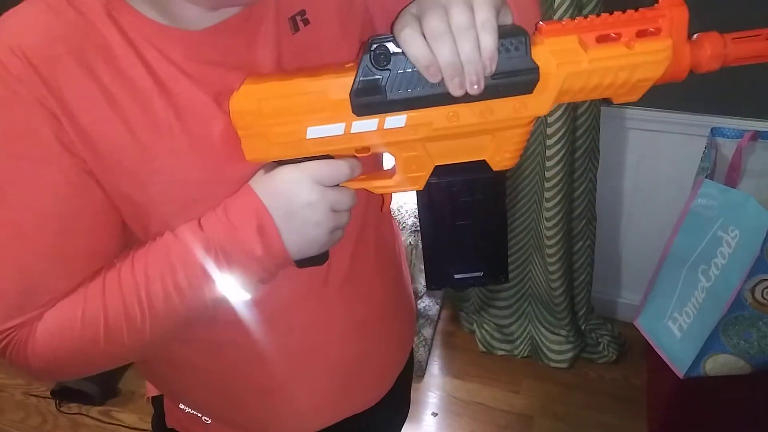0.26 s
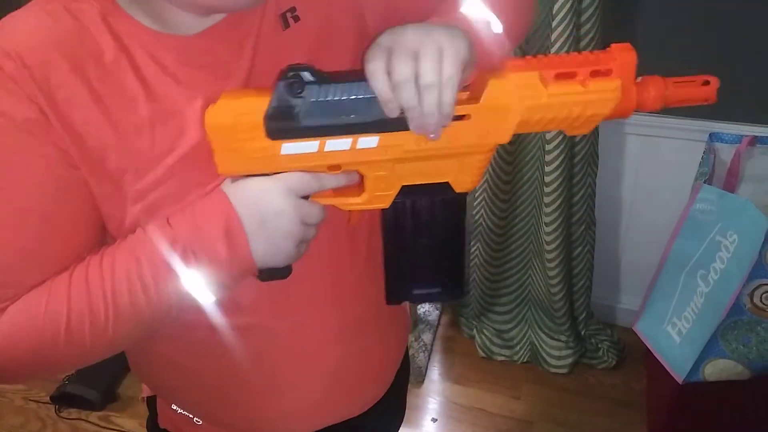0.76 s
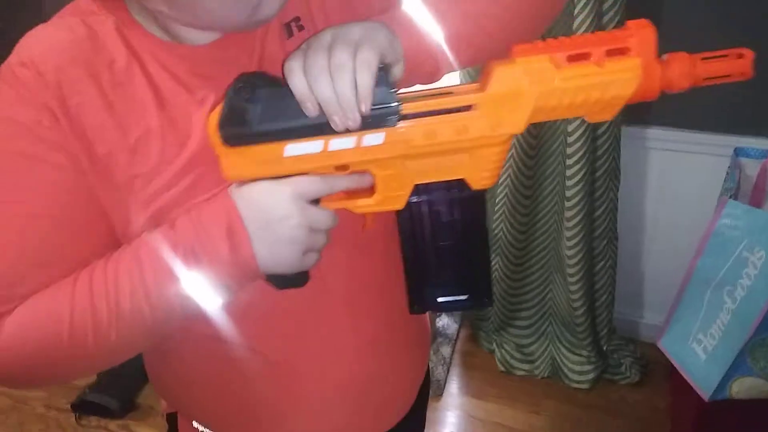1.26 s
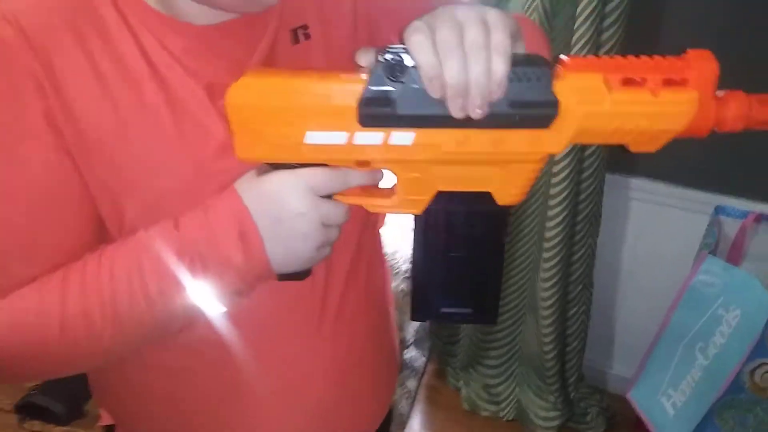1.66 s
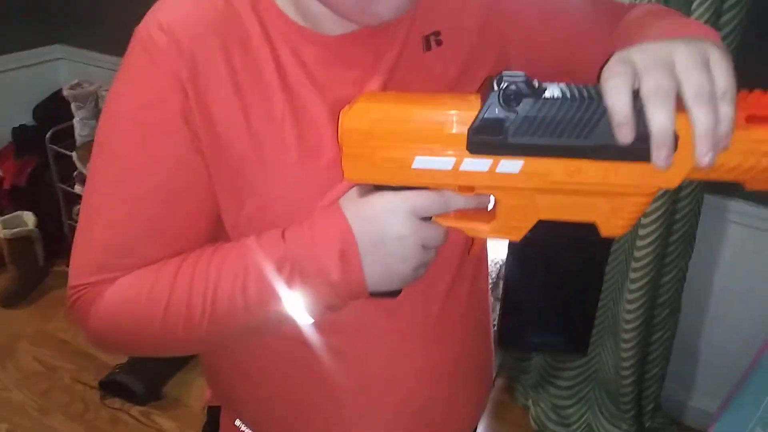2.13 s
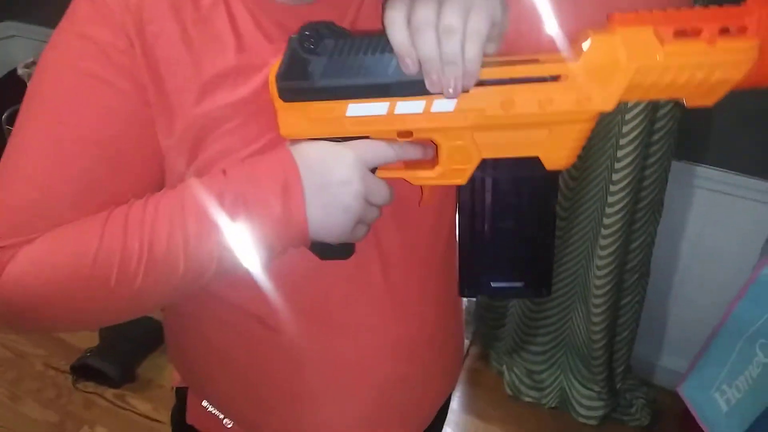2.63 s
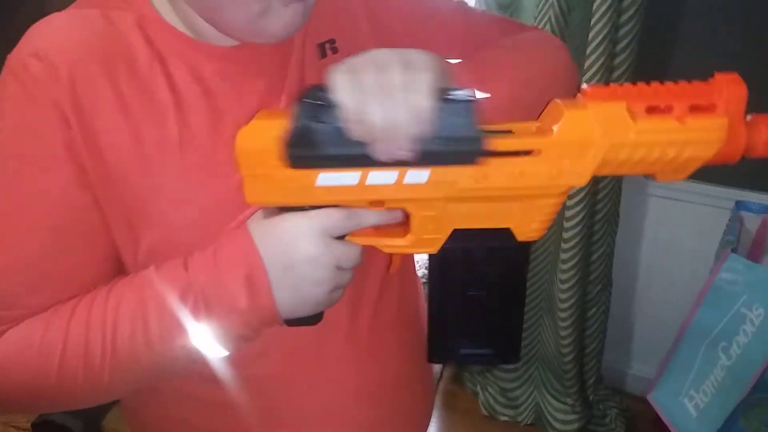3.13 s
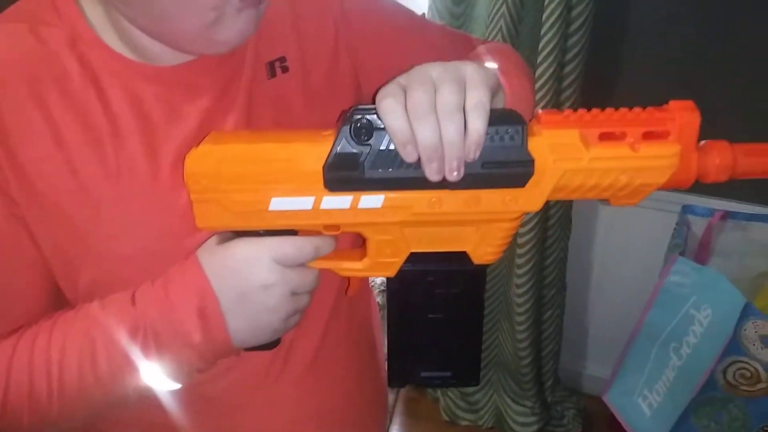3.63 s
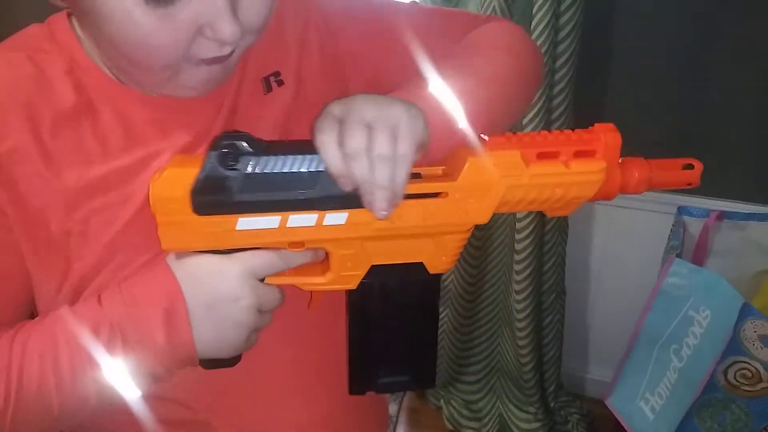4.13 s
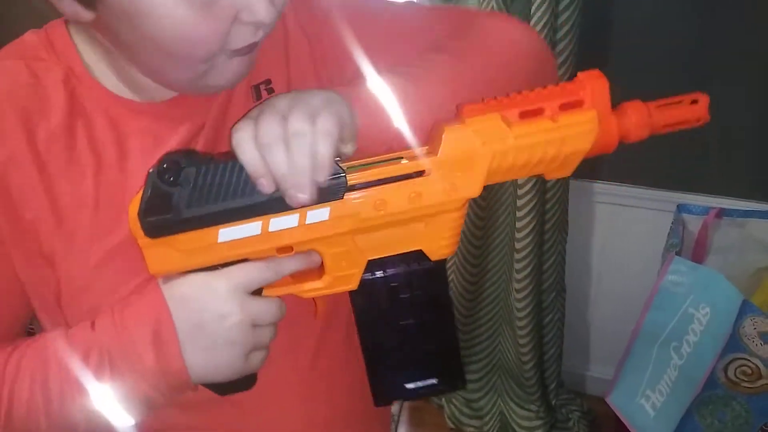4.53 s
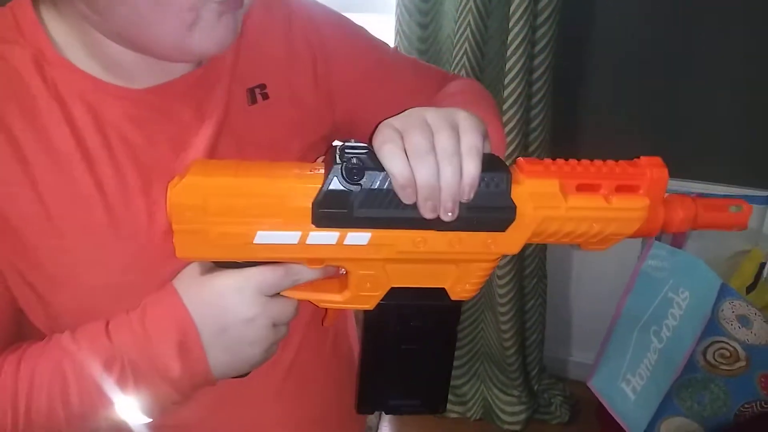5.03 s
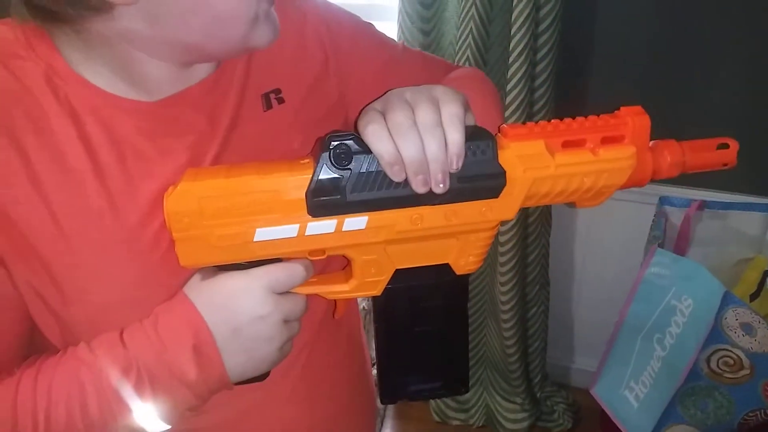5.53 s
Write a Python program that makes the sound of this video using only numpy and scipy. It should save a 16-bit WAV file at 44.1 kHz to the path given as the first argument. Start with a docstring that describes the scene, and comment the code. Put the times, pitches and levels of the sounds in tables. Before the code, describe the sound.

A spring-powered foam dart blaster is fired four times up close indoors, its plastic slide clacking back and shut between loud, punchy snaps.

```python
"""Spring-powered foam dart blaster

Four shots in a small room, close up: filtered noise bursts for the plunger, decaying sines for the air.
About a quarter second after each shot the dart lands across the room, dull and reverberant.
Between shots the plastic slide is pulled back until it catches, then scrapes forward (random grains)
and clacks shut. The loaded spring knocks, buzzes and pings over faint room noise."""
import sys
import numpy as np
from scipy import signal
from scipy.fft import rfft, irfft, next_fast_len
from scipy.io import wavfile
from scipy.ndimage import uniform_filter1d, map_coordinates

SR = 44100
rng = np.random.default_rng(int(sys.argv[2]) if len(sys.argv) > 2 else 0)


def persist_wave(psi):
    """Save psi, clipped to +-1, as 16-bit WAV."""
    counts = np.round(np.clip(psi, -1, 1) * 32767).astype(np.int16)
    wavfile.write(sys.argv[1], SR, np.atleast_2d(counts).T)


N = 255339
T = np.arange(SR * 3 // 4) / SR  # time axis of one event, s
TOP_HZ = 16300  # recorder band limit

# All levels are relative.
# plunger slams: t/s, level/dB, ring f/Hz, ring/dB, thud/dB, snap/dB
SHOTS = [(0.283, -1.5, 783, 1, 2, -8), (1.913, -1.5, 654, 9, 9, -1.5), (3.568, -1.5, 746, 3, 6, -4.5),
         (5.556, -2, 630, 2.5, 6.5, -2.5)]
# contacts in one shot (sear release, slam, rebound, rattle): t after slam/s, level/dB
SHOT_CONTACTS = [(-.0055, -16), (0, 5), (.0075, -3.5), (.013, -13.5)]
# darts landing: t/s, level/dB, ring f/Hz, ring/dB, thud/dB, snap/dB, hollow/dB
LANDINGS = [(0.549, -24, 310, 2, 6, 2, -61), (2.139, -17.5, 550, 12, 15.5, -1.5, -22.5),
            (3.806, -21, 1403, 13, 10.5, 11, -61.5), (5.764, -28.5, 1300, 9, -7, 20, -60)]
# slide breaks free of its front lock: t/s, level/dB, ring f/Hz, ring/dB, bass weight/dB
UNLOCKS = [(0.836, -10, 605, 2, 0.5), (2.419, -10.5, 634, 2.5, -1.5), (4.062, -10, 735, 4.5, 0.5)]
# slide at the back, sear catches plunger: t/s, level/dB, ring f/Hz, ring/dB, bass weight/dB
CATCHES = [(1.066, -22, 1570, 4, -4.5), (2.692, -18, 593, 2, 11.5), (4.339, -22, 1460, 3.5, -13)]
# slide shuts: t/s, level/dB, ring f/Hz, ring/dB, bass weight/dB, push length/s, first shove/dB
CLOSES = [(-0.006, -14.5, 497, 8, 3.5, 0.039, -33.5), (1.645, -10.5, 844, 4, 1.5, 0.056, -30.5),
          (3.287, -11.5, 807, 5, 2.5, .066, -32.5), (4.968, -18.5, 790, 0.5, -1.5, .1, -37)]
# unlocking contacts (slack taken up, lock gives): t after stop/s, level/dB, rise/s, thud/dB, snap/dB
UNLOCK_CONTACTS = [(-.016, -5, 0.0034, -5, -8.5), (0, -1.5, .0004, 3.5, 0.5)]
# catch contacts (ramp, pawl tick, catch, end stop): t after stop/s, level/dB, rise/s, thud/dB, snap/dB
CATCH_CONTACTS = [(-.035, -15.5, 0.0018, -35, -18), (-.019, -15.5, 0.0014, -30, -3), (0, 1, .0018, -17, 0),
                  (.013, -4.5, 0.0026, 5.5, 1)]
# closing contacts (bolt meets dart, slam, lock drops in, rebound):
# t after stop/s, level/dB, rise/s, thud/dB, snap/dB
CLOSE_CONTACTS = [(-.016, -5.5, .0014, -0.5, -8), (0, 0.5, .0004, 6, 2), (.005, -8.5, .0007, 10, -5.5),
                  (.024, -13, .002, -1.5, -13.5)]
# hand sets the slide moving: rise/s, ring f/Hz, ring/dB, thud/dB, snap/dB
SHOVE = (.009, 1251.5, 11.5, 1, -23.5)
# rail rubbing at each stop of the pull: start before stop/s, end after stop/s, final level/dB
UNLOCK_RUB = (.03, -0.0092, -40)
CATCH_RUB = (.045, 0.011, -42.5)
# hollow knocks of the loaded spring in its tube: t/s, level/dB
KNOCKS = [(1.243, -32), (2.794, -30.5), (2.839, -31), (4.519, -34), (4.732, -48)]
# spring coils slip and ping: t/s, level/dB
PINGS = [(1.323, -59), (2.975, -64.5), (3.153, -60.5), (4.579, -53), (5.506, -59)]
# spectra of plunger slam, dart landing, slide pulled back, slide pushed shut: f/Hz, density/dB per Hz
SLAM_SPECTRUM = [(30, -27), (60, -23), (100, -10), (160, -4), (290, 0.5), (450, -3), (720, -4.5),
                 (1000, -8.5), (1550, -4), (2400, -12), (3100, -20.5), (3900, -29.5), (7000, -33),
                 (11000, -40), (14500, -31.5), (17000, -39.5)]
LAND_SPECTRUM = [(40, -41), (100, -8), (170, -12.5), (300, 8.5), (600, 9.5), (1400, 4.5), (2000, -1.5),
                 (2900, -15), (3800, -36), (7000, -52), (16000, -52.5)]
BACK_SPECTRUM = [(40, -28), (100, -15.5), (200, -9.5), (350, 3), (600, -5), (1100, -6.5), (2250, -12),
                 (3500, -28), (5000, -28.5), (8000, -39.5), (11500, -44.5), (14300, -35.5), (17000, -47.5)]
SHUT_SPECTRUM = [(40, -31), (120, -22.5), (280, -8.5), (500, -2.5), (820, 0), (1100, -7), (2000, -3.5),
                 (3200, -22), (3800, -30), (5000, -28.5), (8000, -35.5), (11500, -41), (14300, -28.5),
                 (17000, -38.5)]
# spectra of the spring's tube, the spring's wire, the still room: f/Hz, density/dB per Hz
TUBE_SPECTRUM = [(100, -35), (280, -36.5), (400, -2), (500, 7), (700, 6), (880, -23.5), (1400, -13.5),
                 (2500, -30.5), (4000, -55.5), (16000, -55)]
WIRE_SPECTRUM = [(300, -47), (1300, -27), (1600, -5), (1780, -14), (2000, 0), (2180, -4), (2450, -17),
                 (4000, -47), (16000, -58)]
HUSH_SPECTRUM = [(15, -41), (25, 0), (89, 9), (2050, -14.5), (4030, -13), (5880, -15), (7510, -15.5),
                 (13600, -15), (14800, -13.5), (16000, -9)]
# housing resonances: f/Hz, width/Hz, level/dB
SHELL = [(338, 40, -2.5), (497.3, 12, 10), (648, 39, 5), (803, 110, 6.5), (1450, 210, 0.5), (2114, 190, 3)]
# thin side panels: f/Hz, width/Hz, level/dB
PANELS = [(750, 35, 2.5), (1107, 20, 3.5), (1193, 25, 2.5), (1452, 30, 3.5), (1530, 19, 2.5), (1590, 28, 2),
          (2165, 50, 2.5), (2314, 45, 3.5)]
# modes of a hollow thing that a dart strikes: f/Hz, level/dB, t60/s
HOLLOW = [(277.3, 2.5, 0.3), (423, -13.5, 0.75), (450, 1.5, 0.24)]
# room standing waves set off by the air pop: f/Hz, level/dB, t60/s
BOOM = [(59, -24.5, 0.97), (79.5, -17, 0.69), (97.2, -8, 0.56), (119.1, -12, 0.44), (154.9, 4.5, 0.17),
        (160.5, 1, 0.42), (228.5, -8, 0.54), (236.4, 2, 0.26), (268.4, -2, 0.34), (304.5, -5, 0.4)]
# room reverberation: f/Hz, t60/s
ROOM = [(60, 0.65), (130, 0.5), (250, 0.44), (560, 0.39), (1470, 0.37), (2400, 0.36), (3880, 0.36),
        (10200, 0.34), (16000, 0.1)]
# microphone response: f/Hz, width/Hz, level/dB (0 = no effect)
MICROPHONE = [(2910, 220, 0), (3180, 420, -0.5)]

PUSH_DB = -37  # rubbing at the end of the forward push
BOUNCE_S, BOUNCE_DB, WIRE_DB = 0.0093, -19, -23  # each knock bounces once and shakes the wire


def shots():
    """The sear lets go, the plunger slams home and rebounds, and air drives the dart out."""
    out = np.zeros(N)
    lead_s = 0.01  # room for the sear release ahead of the slam
    for t_s, db, *tone in SHOTS:
        blows = np.zeros(len(T))
        for delay_s, step_db in SHOT_CONTACTS:
            blow = contact(rise_s=0.00087, ring_t60_s=0.015, chatter=0.53, chatter_t60_s=0.081)
            add(blows, lead_s + delay_s, amp(step_db) * blow)
        heard = evened(room(blows, wet_db=-2, treble_db=-0.5, build_s=0.0019))
        slam = voiced(heard, lambda hz: along(SLAM_SPECTRUM, hz) + 0.68 * housing(hz), *tone)
        add(out, t_s - lead_s, amp(db + 21.5) * slam)
        add(out, t_s - 0.003, amp(-4) * air_pop(pop_hz=142.6, pop_t60_s=0.064, boom_db=-14.0))
    return out


def air_pop(pop_hz, pop_t60_s, boom_db):
    """The puff from the barrel: a brief low push that leaves the room's standing waves ringing."""
    push = np.sin(2 * np.pi * pop_hz * T) * fade(T, pop_t60_s) * (1 - np.exp(-T / 0.0036))
    waves = np.zeros(len(T))
    for hz, db, t60_s in BOOM:
        wave = np.sin(2 * np.pi * (hz * T + rng.random()))
        waves += amp(db + rng.normal(0, 1)) * fade(T, t60_s) * wave
    return push + amp(boom_db) * waves * (1 - np.exp(-T / 0.0078))


def clacks(events, spectrum, level_db, ring_t60_s, chatter, wet_db, treble_db):
    """The slide hits its stops and rings the housing; gentle touches lose the upper treble."""
    out = np.zeros(N)
    for t_s, db, rise_s, *tone in events:
        softness = [(5500, 0), (9000, 0.92 * min(db + 17.0, 0))]  # f/Hz, level/dB
        blow = contact(rise_s, ring_t60_s, chatter, chatter_t60_s=0.032)
        heard = evened(room(blow, wet_db, treble_db))
        clack = voiced(heard, lambda hz: along(spectrum, hz) + housing(hz) + along(softness, hz), *tone)
        add(out, t_s, amp(db + level_db) * clack)
    return out


def contacts(stops, action):
    """Every stop of the slide plays the same quick run of contacts, scaled by its force and weight."""
    events = []
    for t_s, db, ring_hz, ring_db, weight_db, *_ in stops:
        for delay_s, step_db, rise_s, thud_db, snap_db in action:
            tone = (ring_hz, ring_db, weight_db + thud_db, snap_db)
            events.append((t_s + delay_s, db + step_db, rise_s, *tone))
    return events


def rails():
    """Stick-slip grains of uneven size, growing louder as the slide gathers speed."""
    out = np.zeros(N)
    # rubbing tilt: f/Hz, level/dB
    sliding = [(800, 3), (1300, 6.0), (2600, -4), (5500, 3), (9000, -15.0)]
    for start_s, end_s, db in strokes():
        length_s = end_s - start_s
        speed = np.clip(T / max(length_s, 0.005), 0, 1) * (T < length_s)
        sizes = rng.exponential(size=len(T)) * rng.choice([-1, 1], len(T))
        slips = unit((rng.random(len(T)) < 900 / SR) * sizes)  # mean 900 grains/s
        rub = coloured(slips * speed, lambda hz: along(SHUT_SPECTRUM, hz) + housing(hz) + along(sliding, hz))
        add(out, start_s, amp(db) * room(rub, wet_db=-4.5))
    return out


def strokes():
    """The slide rubs briefly around each stop of the pull, and all through the push: start/s, end/s, dB."""
    pulls = []
    for stops, (before_s, after_s, db) in [(UNLOCKS, UNLOCK_RUB), (CATCHES, CATCH_RUB)]:
        pulls += [(t_s - before_s, t_s + after_s, db) for t_s, *_ in stops]
    return pulls + [(t_s - push_s, t_s, PUSH_DB) for t_s, *_, push_s, shove_db in CLOSES]


def landings():
    """Soft darts strike across the room: dull, and mostly heard as reverberation."""
    out = np.zeros(N)
    for t_s, db, *tone, hollow_db in LANDINGS:
        blow = contact(rise_s=0.0016, ring_t60_s=0.0026, chatter=0.65, chatter_t60_s=0.11)
        tap = evened(room(blow, wet_db=4.0, build_s=0.0035))
        add(out, t_s, amp(db + 22) * voiced(tap, lambda hz: along(LAND_SPECTRUM, hz), *tone))
        add(out, t_s, amp(hollow_db) * ringing(HOLLOW) * (1 - np.exp(-T / 0.012)))
    return out


def ringing(modes):
    """Softly struck modes: decaying sines, a little different each time."""
    waves = np.zeros(len(T))
    for hz, db, t60_s in modes:
        wave = np.sin(2 * np.pi * (hz * rng.normal(1, 0.022) * T + rng.random()))
        waves += amp(db + rng.standard_normal()) * fade(T, t60_s) * wave
    return waves * (1 - np.exp(-T / 0.0017)) ** 2


def spring():
    """The compressed spring shifts: its tube knocks hollowly and its wire buzzes."""
    out = np.zeros(N)
    bounces = [(t_s + BOUNCE_S, db + BOUNCE_DB) for t_s, db in KNOCKS]
    for t_s, db in KNOCKS + bounces:
        blow = contact(rise_s=0.0013, ring_t60_s=0.026, chatter=0.4, chatter_t60_s=0.017)
        knock = evened(room(blow, wet_db=-2))
        add(out, t_s, amp(db + 20) * coloured(knock, lambda hz: along(TUBE_SPECTRUM, hz)))
    shakes = [(t_s, db + WIRE_DB) for t_s, db in KNOCKS]
    for t_s, db in PINGS + shakes:
        blow = contact(rise_s=0.0021, ring_t60_s=0.058, chatter=0.99, chatter_t60_s=0.27)
        buzz = evened(room(blow, wet_db=-7.5))
        add(out, t_s, amp(db + 21.5) * coloured(buzz, lambda hz: along(WIRE_SPECTRUM, hz)))
    return out


def hush():
    """Faint rumble and hiss of the still room: filtered noise."""
    return amp(-73) * unit(coloured(rng.standard_normal(N), lambda hz: along(HUSH_SPECTRUM, hz)))


def contact(rise_s, ring_t60_s, chatter, chatter_t60_s):
    """A dense burst as the blow runs through the struck body, then uneven chatter of loose parts."""
    onset = (1 - np.exp(-T / rise_s)) ** 2
    # a slow rise also lengthens the burst
    burst = rng.standard_normal(len(T)) * onset * fade(T, ring_t60_s + 5 * rise_s)
    # random level, a new value 350 times/s
    uneven = amp(9.1 * map_coordinates(rng.standard_normal(len(T)), [T * 350], order=1))
    rattle = rng.standard_normal(len(T)) * onset * uneven * fade(T, chatter_t60_s)
    return evened(burst / np.linalg.norm(burst) + chatter * rattle / np.linalg.norm(rattle))


def voiced(x, colour, ring_hz, ring_db, thud_db, snap_db):
    """Where a blow falls picks its ring; its weight sets the bass and its hardness the treble."""
    tilt = [(200, thud_db), (550, 0), (1800, 0.00058), (5000, snap_db)]  # f/Hz, level/dB
    return coloured(x, lambda hz: colour(hz) + along(tilt, hz) + ring_db * bump(hz, ring_hz, 0.23 * ring_hz))


def housing(hz):
    """The dB that the hollow plastic body adds at its resonances."""
    return sum(db * bump(hz, centre_hz, width_hz) for centre_hz, width_hz, db in SHELL + PANELS)


def room(x, wet_db, treble_db=0, build_s=0.00096):
    """x plus a diffuse tail: each band's energy builds up, lingers and returns with scrambled phase."""
    hz, t, z = signal.stft(x, SR, nperseg=256)
    linger = (fade(t, along(ROOM, hz)[:, None]) * (1 - np.exp(-t / build_s))) ** 2
    energy = signal.fftconvolve(np.abs(z) ** 2, linger * t[1] * 40, axes=1)[:, :len(t)]
    scatter = signal.stft(rng.standard_normal(len(x)), SR, nperseg=256)[2]
    gain = amp(wet_db + along([(2500, 0.0022), (6000, treble_db)], hz))[:, None]
    tail = signal.istft(gain * np.sqrt(np.abs(energy)) * scatter / np.std(scatter), SR, nperseg=256)[1]
    return x + tail[:len(x)]


def evened(x, width_hz=420):
    """Smooth away broad chance peaks, so that only the struck body colours a blow; unit energy."""
    power = uniform_filter1d(np.abs(rfft(x)) ** 2, round(width_hz * len(x) / SR))
    grid_hz = np.fft.rfftfreq(len(x), 1 / SR)
    flat = coloured(x, lambda hz: -10 * np.log10(np.interp(hz, grid_hz, np.abs(power) + 1e-12)))
    return flat / np.linalg.norm(flat)


def coloured(x, gain_db):
    """Causal (minimum-phase) filter of unit energy with the given dB response."""
    m = 2 * next_fast_len(len(x))
    gain = unit(amp(gain_db(np.fft.rfftfreq(m, 1 / SR))))
    cepstrum = irfft(np.log(gain))
    # fold the cepstrum to positive time: minimum phase
    cepstrum[1:m // 2] *= 2
    cepstrum[m // 2 + 1:] = 0
    return irfft(rfft(x, m) * np.exp(rfft(cepstrum)))[:len(x)]


def bump(hz, centre_hz, width_hz):
    """A resonance curve of height 1."""
    return 1 / (1 + (2 * (hz - centre_hz) / width_hz) ** 2)


def along(points, hz):
    """(f/Hz, value) points read on a log axis."""
    f, v = np.transpose(points)
    return np.interp(np.log(hz + 1), np.log(f + 1), v)


def fade(t, t60_s):
    """Exponential decay, 60 dB down at t60_s."""
    return np.exp(-np.log(1000) * t / t60_s)


def amp(db):
    """Decibels to gain."""
    return 10 ** (np.asarray(db) / 20)


def unit(x):
    """Scale to rms 1."""
    return x / np.sqrt(np.mean(x ** 2))


def add(track, t_s, x):
    """Mix x into the track at t_s, cropped to the track."""
    i = round(t_s * SR)
    part = x[max(-i, 0):len(track) - i]
    track[max(i, 0):][:len(part)] += part


def scene():
    """All sources summed at one microphone."""
    back = contacts(UNLOCKS, UNLOCK_CONTACTS) + contacts(CATCHES, CATCH_CONTACTS)
    shoves = [(t_s - push_s, shove_db, *SHOVE) for t_s, *_, push_s, shove_db in CLOSES]
    forward = shoves + contacts(CLOSES, CLOSE_CONTACTS)
    pull = clacks(back, BACK_SPECTRUM, level_db=18.5, ring_t60_s=0.036, chatter=0.26,
                  wet_db=-3.5, treble_db=-1.5)
    close = clacks(forward, SHUT_SPECTRUM, level_db=18.5, ring_t60_s=0.051, chatter=1.0,
                   wet_db=-7.0, treble_db=2.5)
    return (shots() + pull + close + rails() + landings() + spring() + hush())[None]


def record(dry, ceiling=0.78):
    """The recorder rounds off the highest peaks, adds its colour and keeps nothing above its band limit."""
    held = dry / (1 + (dry / ceiling) ** 4) ** (1 / 4)
    m = next_fast_len(N + SR)
    hz = np.fft.rfftfreq(m, 1 / SR)
    colour = amp(sum(db * bump(hz, centre_hz, width_hz) for centre_hz, width_hz, db in MICROPHONE))
    return irfft(rfft(held, m) * colour * (hz < TOP_HZ), m)[:, :N]


dry = scene()
out = record(dry)
persist_wave(out)
```